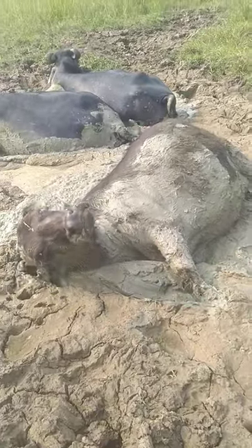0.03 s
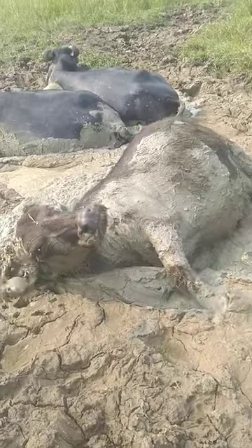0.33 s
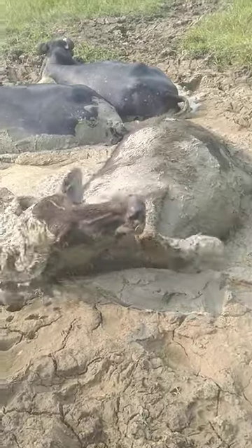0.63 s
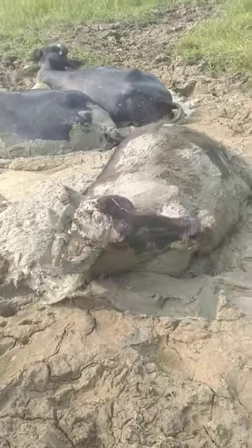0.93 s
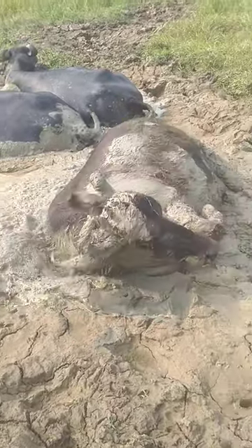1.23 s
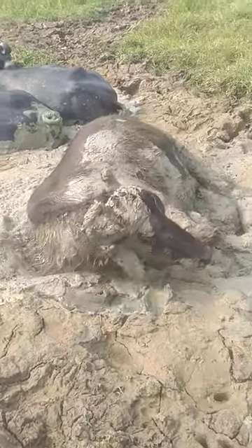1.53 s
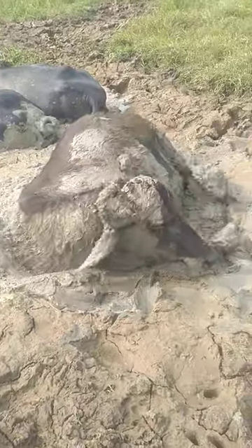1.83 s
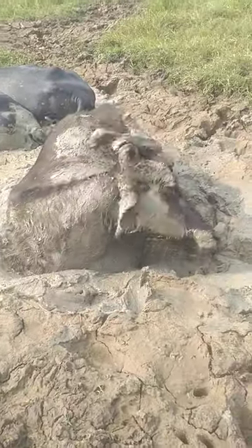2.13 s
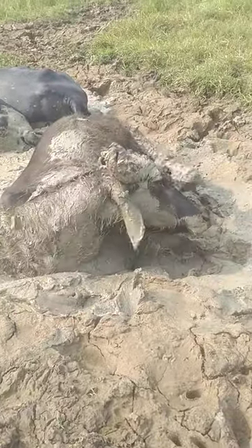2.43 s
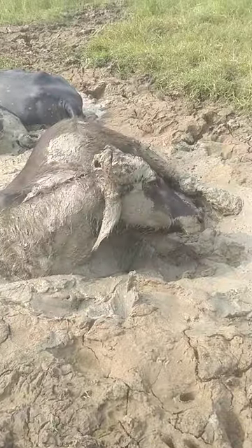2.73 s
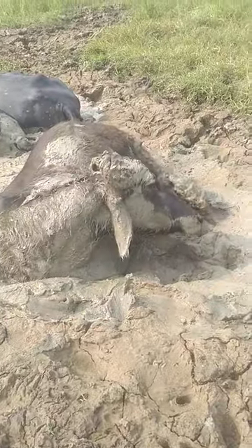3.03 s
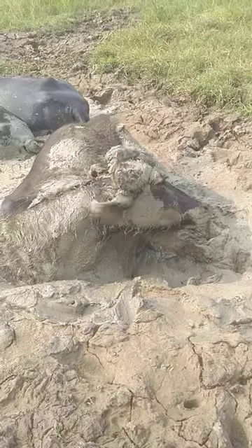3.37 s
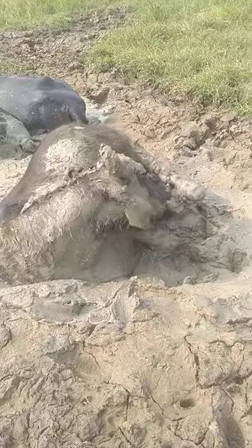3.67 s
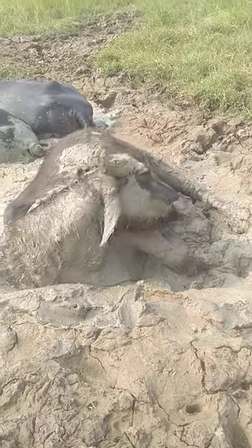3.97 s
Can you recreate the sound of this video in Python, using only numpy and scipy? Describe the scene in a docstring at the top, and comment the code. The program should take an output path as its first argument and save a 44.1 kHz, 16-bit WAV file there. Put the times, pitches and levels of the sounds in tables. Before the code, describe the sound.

A water buffalo wallows in mud with squelches, pops and sharp slaps over light wind.

```python
"""A water buffalo rolls over in a mud wallow, a few metres away in an open field.
Ear, leg and tail land in sharp splats: a thud, a ring of trapped air and a spray of droplets.
Under its weight the mud churns, squelches and blubbers; wet films tear off the hide, air pockets pop.
Behind it, light wind buffets the microphone with a low rumble and drops towards the end."""
import sys
import numpy as np
from scipy import signal
from scipy.fft import rfft, irfft
from scipy.io import wavfile
from scipy.ndimage import uniform_filter1d

SR = 44100
rng = np.random.default_rng(int(sys.argv[2]) if len(sys.argv) > 2 else 0)


def pcm_store(signal):
    """Save signal as 16-bit PCM."""
    levels = np.round(np.clip(np.atleast_2d(signal), -1, 1) * 32767)
    wavfile.write(sys.argv[1], SR, levels.astype(np.int16).T)


N = 176400

# Rides and EQ curves are shapes; each layer's gain is set where it is mixed.
# Ride of the wind rumble: t/s, level/dB
WIND_RIDE = [(0.0, -50.5), (0.14, -40.5), (0.2, -52.5), (0.23, -37.5), (0.26, -51.5), (0.37, -49),
             (0.47, -36), (0.51, -50), (0.57, -35), (0.63, -53.5), (0.69, -40.5), (0.76, -52), (0.79, -43),
             (0.89, -49.5), (1.45, -42), (1.61, -51.5), (1.64, -44.5), (1.76, -50.5), (1.79, -37.5),
             (1.94, -56), (1.98, -44), (2.21, -47.5), (2.24, -61.5), (2.35, -48), (2.62, -42), (2.67, -60),
             (2.71, -50), (2.83, -61.5), (3.02, -52), (3.04, -58), (4.0, -64)]
# EQ of the wind rumble: f/Hz, level/dB
WIND_EQ = [(20, -64), (32, -34.5), (45, -5.5), (58, -0.5), (90, -6.5), (130, -17), (200, -28.5), (400, -62),
           (1000, -57), (4000, -105)]
# Wind swinging between the sides: t/s, left minus right/dB
WIND_PAN = [(0.0, -3), (0.05, 7), (0.13, -28), (0.38, 10.5), (2.08, -1), (2.12, 11), (2.46, -16),
            (2.77, -1.5), (4.0, 1)]
# Gusts catching the microphone: t/s, half length/s, rocking rate/Hz, level/dB
BUFFETS = [(0.092, 0.016, 110.6, -40), (0.129, 0.014, 104.7, -28), (0.392, .009, 72, -30),
           (0.426, 0.0092, 74, -33), (0.567, 0.022, 68.3, -31), (0.602, 0.0058, 90.4, -30.5),
           (1.228, 0.018, 100, -36), (1.28, 0.022, 134.8, -38), (1.355, 0.0076, 68.6, -29),
           (1.638, 0.019, 116.4, -38.5), (1.79, .018, 75.3, -39), (1.992, 0.01, 87, -34.5),
           (2.706, 0.012, 95, -40)]
# EQ of the quiet open air: f/Hz, level/dB
AIR_EQ = [(30, 18.5), (200, -8), (500, -3), (1500, -9.5), (3000, -11.5), (6500, -17), (8000, -26.5),
          (11000, -16.5), (16000, -16)]
# Pan of the mud, leaning left in most bands: f/Hz, left minus right/dB
MUD_PAN = [(100, -6), (280, 5.5), (550, -2.5), (1200, 4), (2500, 4), (5000, 8), (16000, 13)]
# Stereo phase of the mud: f/Hz, left lead/rad
MUD_PHASE = [(100, -0.5), (500, 0.95), (1000, 1.1), (2700, 1), (4600, 1.68), (7000, 2), (11000, 1),
             (16000, 2.5)]
# Ride of the churning mud: t/s, level/dB
CHURN_RIDE = [(0.0, -60), (0.07, -62.5), (0.73, -74.5), (0.97, -71), (1.14, -70.5), (1.6, -69.5),
              (1.72, -62.5), (1.85, -55.5), (1.9, -58.5), (2.19, -56.5), (2.34, -60), (2.46, -64.5),
              (2.66, -63.5), (2.89, -67), (3.41, -73), (3.79, -67), (3.82, -72)]
# EQ of the churn's dull rush: f/Hz, level/dB
CHURN_EQ = [(100, -22.5), (200, 9.5), (300, 5.5), (500, -4.5), (750, 1), (1100, -7), (1500, -8.5),
            (2200, -7), (3000, -25), (8000, -33)]
# Ride of the wet crackle: t/s, level/dB
CRACKLE_RIDE = [(0.0, -49), (0.08, -56), (0.23, -61), (0.45, -58), (0.99, -58), (1.15, -59), (1.28, -60),
                (1.61, -57), (1.78, -62), (2.05, -59), (2.16, -57), (2.4, -62), (2.65, -78), (2.77, -60),
                (2.88, -59), (3.02, -75), (3.24, -64), (3.5, -61.5), (3.65, -59), (3.82, -68.5)]
# EQ of the crackle and the squelch fizz: f/Hz, level/dB
CRACKLE_EQ = [(300, -9.5), (1000, 3.5), (2200, 4.5), (3000, -0.5), (4300, -1), (6300, 2.5), (8000, -10),
              (10500, -3), (16000, -15.5)]
# Mud squeezed through a gap: t/s, half length/s, resonance f/Hz, level/dB
SQUELCHES = [(0.006, 0.043, 740, -54), (0.434, 0.019, 1200, -54.5), (1.262, 0.037, 250, -53),
             (1.702, 0.011, 2930, -52), (1.763, 0.024, 776, -49), (1.793, 0.043, 1480, -57),
             (1.812, 0.018, 3050, -55.5), (1.972, 0.0085, 3550, -54), (2.4, 0.12, 1840, -67.5),
             (2.678, 0.044, 2520, -53.5), (2.721, 0.088, 307, -54), (2.723, 0.069, 1240, -62.5),
             (3.356, 0.038, 1020, -59), (3.63, 0.082, 273, -58.5), (3.926, 0.015, 700, -52)]
# Air blubbering out from under the body: t/s, half length/s, flap rate/Hz, level/dB
FLUTTERS = [(1.253, 0.022, 304, -55.5), (1.767, 0.022, 215.8, -54)]
# Air pockets bursting: t/s, f/Hz, level/dB
POPS = [(0.066, 2280, -35.5), (0.262, 648, -32), (.342, 2800, -44), (.393, 2100, -40), (0.421, 2530, -38),
        (.422, 970, -41), (0.427, 1600, -46), (.476, 930, -50), (0.666, 2670, -42.5), (0.683, 1960, -46),
        (0.8458, 3960, -42), (.887, 1460, -49), (.983, 950, -54), (1.021, 2210, -35), (1.073, 2190, -37),
        (1.092, 3900, -45), (1.074, 605, -51), (1.115, 2050, -47.5), (1.182, 1920, -46.5),
        (1.324, 1420, -48.5), (1.3505, 1100, -39), (1.351, 3240, -41.5), (1.407, 2870, -40.5),
        (1.503, 3280, -39), (1.572, 3520, -40.5), (1.6202, 1460, -43), (1.622, 1920, -38),
        (1.656, 2880, -46), (1.696, 1160, -42.5), (1.698, 370, -39), (1.7367, 402, -35.5),
        (1.874, 960, -42), (2.0029, 1100, -32.5), (2.003, 1470, -33), (2.084, 730, -41), (3.327, 1100, -41),
        (3.328, 1500, -47), (3.347, 810, -50), (3.862, 234, -39.5), (3.896, 348, -33.5), (3.903, 414, -35),
        (3.936, 880, -54)]
# Wet films tearing off the hide: t/s, hold/s, level/dB, tilt/(dB per octave)
SMACKS = [(0.01, 0.00082, -39.5, 4), (.0423, 0.00084, -47, 1.5), (0.064, 0.00091, -45.5, 8),
          (0.111, 0.0009, -44.5, -1.5), (0.177, 0.0014, -48.5, 8.5), (0.411, 0.0016, -42, 0),
          (0.4864, 0.0016, -44, 1.5), (0.527, .002, -46.5, -0.5), (0.758, 0.0075, -56, 0),
          (0.9196, 0.0011, -49.5, 0.5), (1.44, .001, -49, 2), (1.4658, 0.0031, -42.5, 2.5),
          (1.6, 0.00045, -46, 2), (1.811, 0.003, -50, 0), (2.2, 0.0055, -40, 1.5), (2.23, 0.0034, -47, 4),
          (2.264, 0.0013, -41.5, 1.5), (2.278, 0.00035, -39.5, -0.5), (2.3, 0.0047, -43.5, -3),
          (2.336, 0.0016, -46, 1), (2.618, 0.002, -33.5, 5), (2.629, 0.017, -48, 2),
          (2.904, 0.00086, -51, 3.5), (3.072, .0005, -51.5, 7), (3.252, 0.0018, -44, -1),
          (3.575, 0.0045, -54, -5), (3.662, 0.0029, -46.5, 0)]
# EQ of a wet film: f/Hz, level/dB
FILM_EQ = [(500, -7.5), (2000, 3.5), (4000, -0.5), (6500, 1.5), (8000, -9.5), (11000, -5.5), (16000, -12)]
# EQ of flying droplets: f/Hz, level/dB
SPRAY_EQ = [(1000, -21.5), (2600, -21.5), (3600, 11.5), (4300, 5.5), (5500, 8), (6800, 5), (7800, -9),
            (10000, -2), (16000, -4.5)]
# Ear, leg and tail hits: t/s, hold/s, thud level/dB, body level/dB, spray level/dB, trapped air f/Hz
SPLATS = [(0.2611, 0.0002, -38.5, -25.5, -33.5, 1450), (1.0195, 0.008, -62, -44, -43, 1300),
          (1.792, 0.0039, -46.5, -43.5, -41, 2050), (2.291, 0.00037, -33.5, -30, -38, 2110),
          (2.623, 0.0025, -49, -39.5, -34, 2200), (2.745, 0.0012, -45.5, -41, -36.5, 2120),
          (2.7593, 0.0012, -66, -35, -40, 2260), (2.7613, 0.00092, -28.5, -23, -23, 2200),
          (3.2594, 0.0027, -61, -45.5, -47, 1950), (3.8413, 0.0062, -47, -47.5, -36, 2360),
          (3.8594, 0.0038, -21.5, -16, -19.5, 1845), (3.868, 0.0072, -57, -40, -39, 1910),
          (3.878, 0.0072, -39.5, -32, -30.5, 1900), (3.8956, 0.0011, -38, -25.5, -31, 2080),
          (3.9036, 0.0011, -38, -36, -35, 910)]

NARROW, WIDE = 0.15, 0.62  # stereo width, as side gain over mid gain


def amp(db):
    """Decibels to gain."""
    return 10 ** (np.asarray(db) / 20)


def unit_rms(x):
    """Normalise each channel to an RMS of one."""
    return x / np.sqrt(np.mean(x ** 2, axis=-1, keepdims=True) + 1e-20)


def at_level(x, env, db):
    """Give x the RMS of its envelope, trimmed by db."""
    return amp(db) * unit_rms(x) * np.sqrt(np.mean(env ** 2))


def curve_at(points, hz):
    """Read a curve along a log frequency axis."""
    f, value = np.transpose(points)
    return np.interp(np.log(hz + 1), np.log(f + 1), value)


def ride(curve):
    """A fader ride as one gain per sample."""
    return amp(np.interp(np.arange(N) / SR, *np.transpose(curve)))


def add(mix, start_s, sound):
    """Drop a sound into the mix at its cue."""
    part = mix[:, max(round(start_s * SR), 0):][:, :sound.shape[-1]]
    part += sound[..., :part.shape[1]]


def eq(x, points, size=4096):
    """Minimum-phase EQ: nothing rings ahead of a transient."""
    log_gain = np.log(amp(curve_at(points, abs(np.fft.fftfreq(size, 1 / SR)))))
    taps = np.fft.ifft(np.exp(np.conj(signal.hilbert(log_gain)))).real[:size // 2]
    return signal.fftconvolve(x, taps[None], axes=1)[:, :x.shape[1]]


def band(x, lo_hz, hi_hz):
    """Gentle band-pass."""
    return signal.sosfilt(signal.butter(2, [lo_hz, hi_hz], "band", fs=SR, output="sos"), x)


def resonate(x, hz, width_hz):
    """One ringing resonance."""
    r = np.exp(-np.pi * width_hz / SR)
    return signal.lfilter([1, 0, -1], [1, -2 * r * np.cos(2 * np.pi * hz / SR), r * r], x)


def stereo_noise(count, width):
    """Mid/side white noise."""
    mid, side = rng.standard_normal((2, count))
    return np.array([mid + width * side, mid - width * side])


def clicks(per_s, spread_db):
    """Random clicks, most small and a few large."""
    size = amp(spread_db * np.minimum(rng.exponential(1, N), 4.5))
    return size * rng.choice([-1, 1], N) * (rng.random(N) < per_s / SR)


def grains(per_s, spread_db, decay_s):
    """Envelope of many tiny overlapping bursts."""
    power = signal.lfilter([1], [1, -np.exp(-1 / (decay_s * SR))], clicks(per_s, spread_db) ** 2)
    return np.sqrt(power)


def contact(hold_s, decay_s, attack_s=0.00034, tail_db=-29, tail_s=0.0045):
    """Envelope of a wet hit: hard attack, hold, fast decay and a faint tail."""
    t = np.arange(SR // 16) / SR
    after = np.maximum(t - hold_s, 0)
    release = np.exp(-after / decay_s) + amp(tail_db) * np.exp(-after / tail_s)
    return np.minimum(t / attack_s, 1) * release


def snap(count, db):
    """The single pressure spike at the front of a hit."""
    return -amp(db) * (np.arange(count) == 0)


def open_air():
    """The quiet, wide bed of the field, a touch louder on the left."""
    return amp(-57.5) * unit_rms(eq(stereo_noise(N, width=0.97), AIR_EQ)) * amp([[1.5], [-1.5]])


def eddies():
    """Low turbulence of steady strength, unrelated at the two microphone ports."""
    rumble = eq(rng.standard_normal((2, N + SR)), WIND_EQ, size=16384)
    power = uniform_filter1d(uniform_filter1d(rumble ** 2, size=2400), size=2400)
    return (rumble / np.sqrt(abs(power) + 1e-20))[:, SR:]


def buffet(peak_s, half_s, hz, db, wobble_depth=0.33):
    """One eddy sweeps past and rocks the air at each port for a few uneven cycles."""
    t = np.arange(peak_s - 3 * half_s, peak_s + 3 * half_s, 1 / SR)
    wobble = unit_rms(uniform_filter1d(rng.standard_normal((2, len(t))), size=130))
    turns = np.cumsum(hz * (1 + wobble_depth * wobble), axis=1) / SR
    swell = np.exp(-((t - peak_s) / half_s) ** 2)
    return t[0], amp(db) * swell * unit_rms(np.sin(2 * np.pi * turns))


def wind():
    """Turbulence on the microphone: rumble and dull buffets, panned at constant power."""
    rumble = amp(6) * ride(WIND_RIDE) * eddies()
    for row in BUFFETS:
        add(rumble, *buffet(*row))
    sides = ride(WIND_PAN) ** np.array([[.5], [-.5]])
    return band(rumble, 32.7, 8000) * sides / np.sqrt(np.mean(sides ** 2, axis=0))


def bank_scatter(dry, wet_db=-18, t60_s=0.088):
    """The banks of the wallow add a short, faint reverb."""
    t = np.arange(SR // 3) / SR
    tail = band(stereo_noise(len(t), width=0.36), 125, 12400)
    tail *= amp(-60 * t / t60_s) * np.minimum(t / 0.0022, 1)
    wet = signal.fftconvolve(dry, tail / np.linalg.norm(tail[0]), axes=1)[:, :N]
    return dry + amp(wet_db) * wet


def pan_mud(mud):
    """Level and phase differences between the ports place the wallow slightly left."""
    hz = np.fft.rfftfreq(N, 1 / SR)
    sides = amp(np.outer([.5, -.5], curve_at(MUD_PAN, hz)))
    phase = np.exp(1j * np.outer([.5, -.5], curve_at(MUD_PHASE, hz)))
    return irfft(rfft(mud) * phase * sides / sides.mean(0), N)


def pop(hz, attack_cycles=0.12, ring_cycles=3.03, glide=0.024, tick_db=-10, tick_cycles=2.1):
    """An air pocket opens with a tick and rings for a few cycles, bending up a little."""
    cycles = np.arange(SR // 16) / SR * hz
    attack = 1 - np.exp(-cycles / attack_cycles)
    env = attack * np.exp(-cycles / ring_cycles)
    turns = np.cumsum(hz * (1 + glide * np.tanh(cycles / ring_cycles - 1))) / SR
    tick = unit_rms(band(rng.standard_normal(len(env)), hz * 0.26, min(hz * 1.61, SR / 3)))
    tick *= attack * np.exp(-cycles / tick_cycles)
    return (env * np.sin(2 * np.pi * turns) + amp(tick_db) * tick) / env.max()


def bubbles(pitches_hz, per_s, spread_db, treble_lean=0):
    """Small bubbles burst at random, sharing the rate among their pitches."""
    cloud = np.zeros(N)
    for hz in pitches_hz:
        triggers = clicks(per_s / len(pitches_hz), spread_db)
        cloud += signal.oaconvolve(triggers, pop(hz))[:N] * (hz / 1000) ** treble_lean
    return unit_rms(cloud)


def churn():
    """Mud squeezed under the body: a dull rush full of small bubbles."""
    rush = unit_rms(eq(stereo_noise(N, NARROW), CHURN_EQ))
    froth = bubbles(np.geomspace(330, 2600, 22), per_s=210, spread_db=8, treble_lean=0.22)
    return ride(CHURN_RIDE) * (amp(3.5) * rush + amp(-12) * froth)


def crackle():
    """Countless tiny films break on the moving hide, with high bubble pips on top."""
    films = grains(per_s=1300, spread_db=5.5, decay_s=0.0014) * stereo_noise(N, WIDE)
    pips = bubbles(np.geomspace(2800, 7000, 16), per_s=110, spread_db=3.5)
    return ride(CRACKLE_RIDE) * (amp(-2) * unit_rms(eq(films, CRACKLE_EQ)) + amp(-10) * pips)


def squelches(q=1.67, rise=0.0075, fizz_db=-9):
    """Sputtering mud excites a soft cavity whose pitch rises slightly as it closes."""
    out = np.zeros((2, N))
    sputter = grains(per_s=1400, spread_db=3.5, decay_s=0.002) * stereo_noise(N, NARROW)
    for peak_s, half_s, hz, db in SQUELCHES:
        start_s = max(peak_s - 2 * half_s, 0)
        drive = sputter[:, round(start_s * SR):round((peak_s + 2 * half_s) * SR)]
        from_peak = (start_s + np.arange(drive.shape[1]) / SR - peak_s) / half_s
        carrier = np.exp(2j * np.pi * np.cumsum(hz * (1 + rise * from_peak)) / SR)
        r = np.exp(-np.pi * hz / q / SR)
        # Shift down, low-pass, shift back: a resonance that follows the glide.
        ring = (carrier * signal.lfilter([1], [1, -2 * r, r * r], drive / carrier)).real
        fizz = amp(fizz_db) * unit_rms(eq(drive, CRACKLE_EQ))
        add(out, start_s, amp(db) * np.exp(-from_peak ** 2) * (unit_rms(ring) + fizz))
    return out


def flutter(peak_s, half_s, hz, db, rise=0.08, jitter=0.035):
    """Escaping air flaps a lip of mud open and shut, unevenly and ever faster."""
    t = np.arange(max(peak_s - 2 * half_s, 0), peak_s + 2 * half_s, 1 / SR)
    from_peak = (t - peak_s) / half_s
    waver = unit_rms(uniform_filter1d(rng.standard_normal(len(t)), size=150))
    flap_count = np.floor(np.cumsum(hz * (1 + rise * from_peak + jitter * waver)) / SR)
    pulses = np.diff(flap_count, prepend=0) * rng.uniform(0.43, 1, len(t))
    return t[0], amp(db) * np.exp(-from_peak ** 2) * unit_rms(band(pulses, 490, 1080))


def smack(hold_s, db, tilt_db_per_octave):
    """A film of mud tears off the hide with a bright tick."""
    env = contact(hold_s, decay_s=0.0028)
    tone = [(hz, film_db + tilt_db_per_octave * np.log2(hz)) for hz, film_db in FILM_EQ]
    tear = snap(len(env), db=10.5) + env * stereo_noise(len(env), WIDE)
    return at_level(eq(tear, tone), env, db)


def first_touch(body_db, swell_s=0.0027):
    """Wet skin meets the mud an instant early: a tiny swell into the hit."""
    until_hit = np.arange(SR // 100)[::-1] / SR
    film = unit_rms(eq(stereo_noise(len(until_hit), WIDE), FILM_EQ))
    return amp(body_db - 12.5) * np.exp(-until_hit / swell_s) * film


def splat(hold_s, thud_db, body_db, spray_db, cavity_hz, body_band_hz=(896, 2620)):
    """A blow on mud: a spike, a dull thud, the ring of trapped air and a spray of droplets."""
    env = contact(hold_s, decay_s=0.0021)
    thud_env = contact(hold_s, decay_s=0.0023)
    spike = snap(len(env), db=19)
    push = spike + thud_env * stereo_noise(len(env), NARROW)
    hit = spike + env * stereo_noise(len(env), NARROW)
    drops = spike + env * stereo_noise(len(env), WIDE)
    knock = unit_rms(resonate(push, hz=700, width_hz=190))
    weight = amp(-7.5) * unit_rms(band(push, 124, 560))
    slap = unit_rms(band(band(hit, *body_band_hz), *body_band_hz))
    cavity = unit_rms(resonate(hit, cavity_hz, width_hz=230))
    thud = at_level(band(knock + weight, 84, 920), env, thud_db)
    body = at_level(slap + cavity, env, body_db)
    spray = at_level(eq(drops, SPRAY_EQ), env, spray_db)
    return thud + body + spray


def scene():
    """The mud bus gets reverb and pan; wind and open air are mixed in dry."""
    mud = churn() + crackle() + squelches()
    for cue_s, hold_s, thud_db, body_db, spray_db, cavity_hz in SPLATS:
        touch = first_touch(body_db)
        add(mud, cue_s - touch.shape[1] / SR, touch)
        add(mud, cue_s, splat(hold_s, thud_db, body_db, spray_db, cavity_hz))
    for row in FLUTTERS:
        add(mud, *flutter(*row))
    for cue_s, *row in SMACKS:
        add(mud, cue_s, smack(*row))
    for cue_s, hz, db in POPS:
        add(mud, cue_s, amp(db) * pop(hz))
    return pan_mud(bank_scatter(mud)) + wind() + open_air()


def record(dry):
    """A steep high cut on the master."""
    taps = signal.firwin(255, cutoff=16200, window=("kaiser", 9), fs=SR)
    return signal.oaconvolve(dry, taps[None], "same")


dry = scene()
out = record(dry)
pcm_store(out)
```